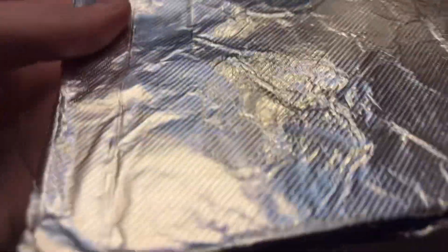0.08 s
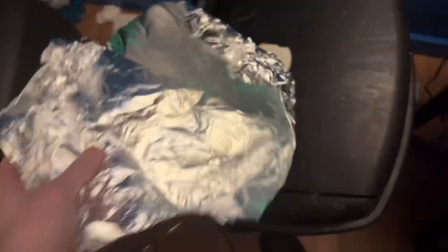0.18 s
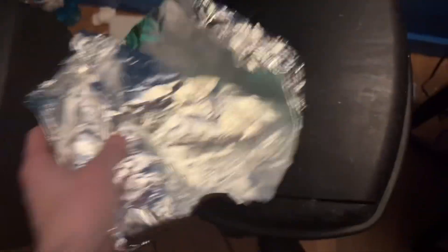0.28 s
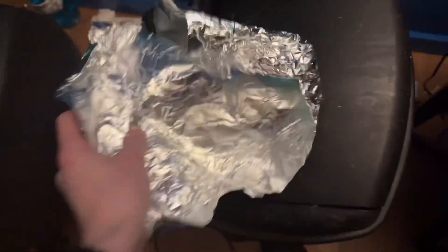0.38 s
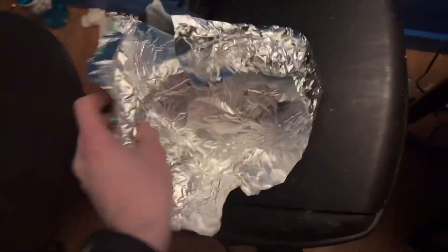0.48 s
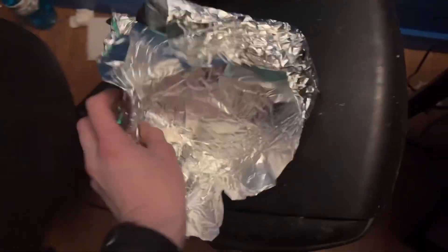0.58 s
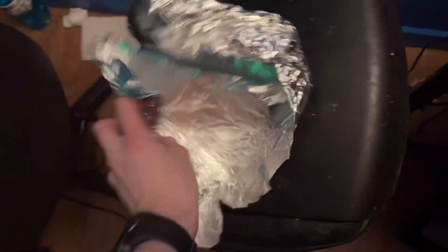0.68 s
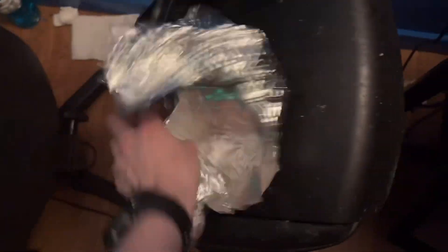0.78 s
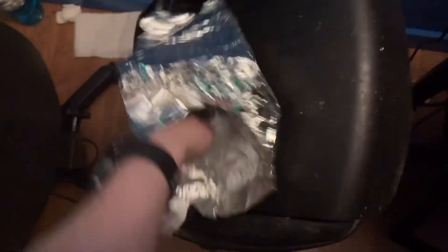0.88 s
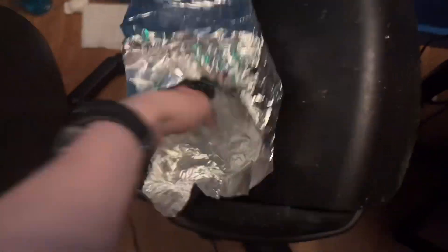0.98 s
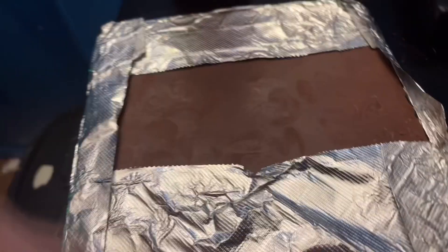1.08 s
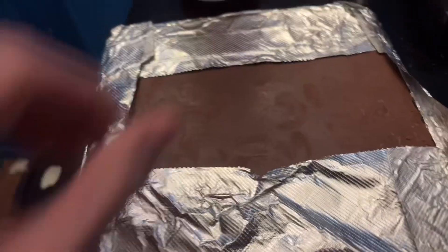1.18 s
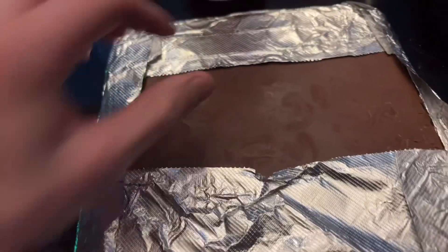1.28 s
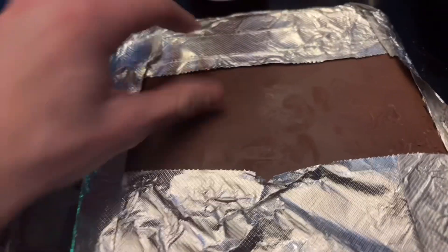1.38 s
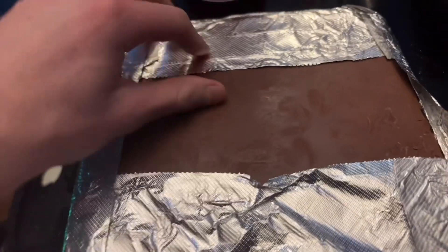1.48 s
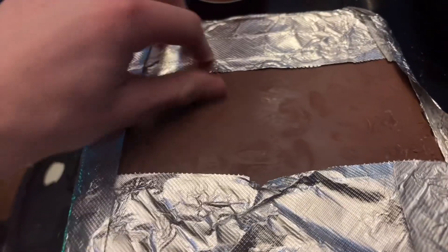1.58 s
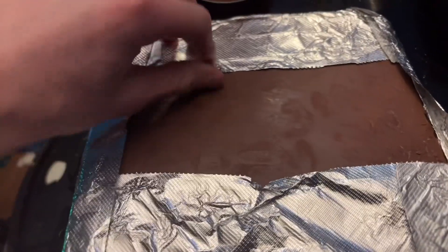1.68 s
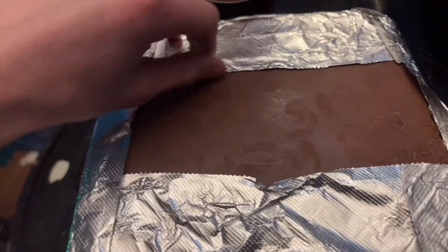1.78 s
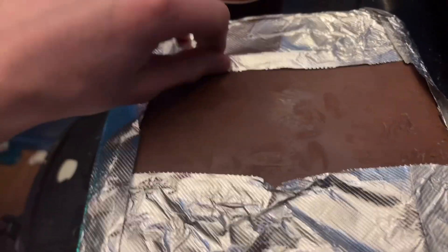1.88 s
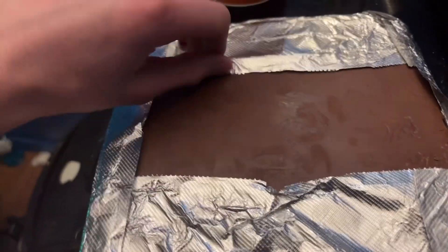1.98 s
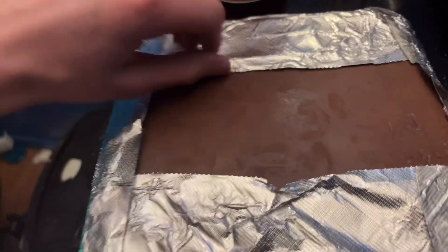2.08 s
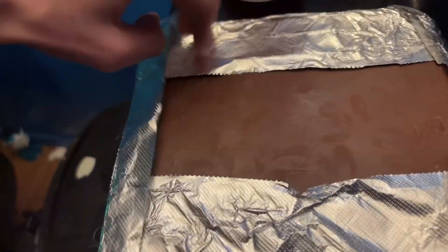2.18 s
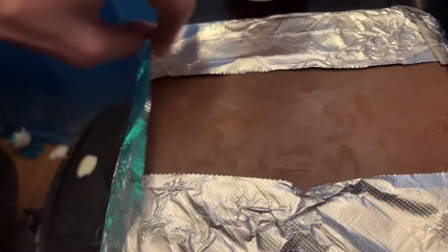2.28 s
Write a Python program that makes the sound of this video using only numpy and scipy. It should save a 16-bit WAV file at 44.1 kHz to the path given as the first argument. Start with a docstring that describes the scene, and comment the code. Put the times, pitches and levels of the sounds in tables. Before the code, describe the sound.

Aluminium foil crumples close to the microphone in a small room: faint rustle at first, a sharp burst at 0.21 s, uneven crackling, then the loudest dense snaps around 0.75-0.9 s, with hand thumps to 1.03 s. An abrupt cut at 1.05 s leaves low rumble and faint hiss. Fingers pick quietly from 1.4 s, tap the slab at 2.02 s, and crinkle slightly more towards 2.28 s.

```python
"""Aluminium foil crumples loudly, close to the microphone in a small room, as it comes off a chocolate slab
and is pushed down on a chair. Creases buckle in dense swarms of tiny rings over a dull drag of the hand;
sharper snaps are ticks with short runs of buckles, and bumps of the hand spread as bending waves.
After an abrupt cut, fingers pick quietly at the foil edge, its flap ringing, and tap the slab.
A low room rumble, with faint hiss, hum and whine made of filtered noise, lies under it all."""
import sys
import numpy as np
from scipy import signal
from scipy.fft import rfft, irfft
from scipy.io import wavfile
from scipy.ndimage import uniform_filter1d

SR = 44100
rng = np.random.default_rng(int(sys.argv[2]) if len(sys.argv) > 2 else 0)


def wav_out(sig):
    """Save sig, one row per channel (or a flat mono array), as 16-bit PCM at SR to the path in sys.argv[1]."""
    wavfile.write(sys.argv[1], SR, np.round(np.clip(np.atleast_2d(sig).T, -1, 1) * 32767).astype(np.int16))


N = 101430  # 2.3 s
CUT_S = 1.051  # the loud crumpling ends abruptly here


def undb(db):
    """Decibels to gain."""
    return 10 ** (np.asarray(db) / 20)


def unit(x):
    """Scale to rms 1."""
    return x / np.sqrt(np.mean(x ** 2) + 1e-18)


def add(out, s, x):
    """Mix x into out from time s."""
    i = int(np.clip(s * SR, 0, N - 1))
    out[i:i + len(x)] += x[:N - i]


def t60_decay(t, t60_s):
    """Exponential decay that falls 60 dB in t60_s seconds."""
    return np.exp(-np.log(1000) * t / t60_s)


def colour(x, points, size=4096):
    """Causal minimum-phase filter of unit energy through (f/Hz, level/dB) points."""
    hz, db = np.array(points).T
    bins_hz = np.arange(size // 2 + 1) * SR / size + 1
    gain = undb(np.interp(np.log(bins_hz), np.log(hz), db))
    # fold the cepstrum onto positive time
    cepstrum = irfft(np.log(gain))
    cepstrum[1:size // 2] *= 2
    cepstrum[size // 2 + 1:] = 0
    response = irfft(np.exp(rfft(cepstrum)))
    return signal.fftconvolve(x, response / np.linalg.norm(response))[:len(x)]


def ring(hz, cycles, size=1400):
    """A foil facet ringing briefly, unit energy; it decays by a factor e in the given cycles."""
    turn = np.arange(size) / SR * min(hz, .45 * SR)
    y = np.sin(2 * np.pi * turn) * np.exp(-turn / cycles)
    return y / np.linalg.norm(y)


def crackle(per_s, points, crack=1.0, even_s=0.015, facet_cycles=13.2, size_spread_db=3):
    """A swarm of buckling creases: each is a click and a ring of its own pitch and size."""
    out = np.zeros(N)
    rows = rng.random((int(per_s * N / SR), 4))
    for when, pitch, size, sign in rows:
        grain = ring(900 + 4600 * pitch, facet_cycles)
        grain[0] += crack * 2
        gain = undb(-size_spread_db * np.log(size + 0.18))  # few large, many small
        add(out, when * N / SR, grain * np.sign(sign - .5) * gain)
    y = colour(out, points)
    # even out the power so that the caller sets the level
    power = np.abs(uniform_filter1d(y ** 2, int(even_s * SR) + 1))
    return y / np.sqrt(power + 1e-9)


def clusters(t, per_s=130, decay_s=0.0097):
    """Buckles set each other off: the level jumps at random moments and dies away; spread 1."""
    out = np.zeros(N)
    for when, size in rng.random((int(per_s * N / SR), 2)):
        add(out, when * N / SR, (.5 + size) * np.exp(-t[:2048] / decay_s))
    out = np.sqrt(out)
    return unit(out - out.mean())


def sheet(t, per_s=1700, cluster_db=2):
    """The loose sheet crackles in clusters, as hard as the hand crumples it, over a dull drag."""
    # how hard the sheet is crumpled: t/s, level/dB
    crumple = [(0, -28), (0.019, -33.5), (0.051, -43), (0.072, -32.5), (.13, -35.5), (0.187, -43),
               (.194, -74), (0.213, -80), (0.215, -19.5), (.275, -20.5), (0.334, -23.5), (.385, -31),
               (.415, -26.5), (.44, -31), (0.465, -26.5), (0.477, -24), (0.508, -32.5), (.565, -31.5),
               (.615, -31.5), (.64, -27.5), (.694, -28.5), (.704, -24), (0.727, -23), (0.753, -11.5),
               (.79, -18.5), (0.812, -15), (0.861, -22), (0.878, -17), (.905, -20), (0.935, -25),
               (1.0, -35.5), (1.021, -27), (1.05, -25)]
    # colour of the loose sheet: f/Hz, level/dB per Hz
    sheet_colour = [(60, -31), (200, -19), (320, -12), (500, -15), (800, -14.5), (1200, -5), (1650, -6),
                    (2200, -2.5), (3100, -1), (4000, -6), (5000, -14.5), (6000, -21.5), (7300, -50.5),
                    (8800, -43.5), (13000, -38.5), (16000, -53.5)]
    # dull rumble of the hand dragging the sheet: f/Hz, level/dB per Hz
    drag_colour = [(25, -28), (50, -8), (100, -2.5), (180, -1.5), (240, -11), (320, -3), (450, -19),
                   (750, -11.5), (1500, -32.5), (4000, -77.5)]
    # level of that drag: t/s, level/dB
    drag_level = [(0, -47), (0.172, -40), (.2, -78), (0.229, -34), (.4, -44), (.48, -39), (.7, -46),
                  (0.817, -23.5), (.9, -42), (1.05, -41)]
    s, db = np.array(crumple).T
    level_db = np.interp(t, s, db)
    creases = crackle(per_s, sheet_colour) * undb(level_db + cluster_db * clusters(t))
    s, db = np.array(drag_level).T
    drag = unit(colour(rng.standard_normal(N), drag_colour)) * undb(np.interp(t, s, db))
    return creases + drag


def room(x, first_s=0.0022, t60_s=0.22, tail_db=-9):
    """Close furniture and walls give a short, dense tail."""
    t = np.arange(SR // 2) / SR
    tail = rng.standard_normal(len(t)) * t60_decay(t, t60_s) * (t > first_s)
    return x + undb(tail_db) * signal.fftconvolve(x, tail / np.linalg.norm(tail))[:N]


def air(air_db=-53.5):
    """Faint steady rumble and hiss, with a low hum and a thin whine from resonances on noise."""
    # colour of the room background: f/Hz, level/dB per Hz
    air_colour = [(25, -12.5), (58, -13.5), (90, -14.5), (124, -15.5), (220, -25.5), (320, -22.5),
                  (450, -30), (850, -34), (1200, -24.5), (1600, -28.5), (2400, -24), (3900, -38.5),
                  (4400, -44), (6000, -44.5), (8000, -55.5), (15000, -51.5)]
    # narrow resonances humming in the room: f/Hz, width/Hz, level/dB
    resonances = [(60.4, 24, -55), (317, 12, -69), (3820, 35, -69.5)]
    hz = np.arange(N // 2 + 1) * SR / N
    hum = np.zeros(N)
    for f, width, db in resonances:
        spectrum = rfft(rng.standard_normal(N)) / (1 + (2 * (hz - f) / width) ** 2)
        hum += undb(db) * unit(irfft(spectrum, N))
    return hum + undb(air_db) * unit(colour(rng.standard_normal(N), air_colour))


def snaps(count=5, size=2048, scatter=0.37, fade=0.96, after_db=-2, nominal_s=0.0028, bright_db=-38,
          cycles=4.3, crack=1.54, snap_db=-4):
    """A crease gives way with one sharp tick and a quick run of buckles, each weaker than the last."""
    # single creases snapping: t/s, level/dB (before snap_db), f/Hz, length of the run of buckles/s
    snap_events = [(0.0574, -20, 3830, 0.0085), (0.2147, -11.5, 2880, 0.0037), (0.2388, -16, 2550, 0.0037),
                   (.25, -11.5, 2930, 0.0033), (0.2716, -11, 2500, 0.011), (0.3493, -13, 3020, 0.011),
                   (0.4142, -18.5, 2890, .004), (0.469, -11, 3210, 0.005), (0.522, -24, 4300, 0.00099),
                   (0.594, -21, 2800, 0.0061), (0.628, -19, 2920, .005), (0.6995, -12, 2540, 0.004),
                   (0.7466, -8, 2780, 0.005), (.754, -14, 2830, 0.0017), (.765, -6.5, 2690, 0.0074),
                   (0.783, -12, 3100, 0.0027), (0.7948, -5.5, 3080, 0.00094), (0.8018, -10.5, 3230, 0.0028),
                   (0.816, -10, 3060, .003), (.824, -7, 2240, 0.0055), (0.8347, -10, 3000, .003),
                   (0.8717, -9, 2340, 0.0054), (0.893, -10, 2890, 0.0017), (0.956, -24, 3050, 0.0023),
                   (1.0114, -23.5, 2660, 0.0024), (1.4034, -39, 2620, 0.0015), (1.414, -39, 3900, 0.0024),
                   (1.424, -24.5, 2840, 0.003), (1.449, -46, 2400, 0.0016), (1.4827, -36.5, 2900, 0.0022),
                   (1.715, -31.5, 3370, 0.0045), (1.8192, -33, 3030, 0.0021), (1.8334, -32.5, 4020, 0.002),
                   (1.8415, -31, 4500, 0.00087), (1.845, -35, 3620, 0.0011), (1.863, -31.5, 2250, 0.00039),
                   (2.0213, -35.5, 6330, 0.00047), (2.045, -32.5, 2470, 0.0016),
                   (2.0985, -35, 2380, 0.0019), (2.1105, -32.5, 2600, 0.0031), (2.117, -33, 2900, 0.0018),
                   (2.178, -34.5, 2840, 0.004), (2.2152, -27.5, 2730, 0.0033),
                   (2.2222, -25.5, 3300, 0.0015), (2.2385, -33, 3440, 0.00036), (2.2472, -25, 2400, 0.0014),
                   (2.2675, -19.5, 3900, 0.0026), (2.2711, -20, 3320, 0.0007), (2.2858, -22, 2840, 0.001)]
    # colour of a snap: f/Hz, level/dB per Hz
    snap_colour = [(100, -26), (700, -10.5), (1300, -7), (3200, 5), (4500, 2.5), (5600, -8), (7300, -38),
                   (9500, -26.5), (16000, -33.5)]
    out = np.zeros(N)
    top_octave = signal.butter(4, 8800, "high", fs=SR, output="sos")
    for s, db, hz, length in snap_events:
        run = np.zeros(size)
        for k, (late, pitch, sign) in enumerate(rng.random((count, 3))):
            follows = k > 0  # the first tick keeps its own time, pitch and level
            grain = ring(hz * np.exp(scatter * (2 * pitch - 1) * follows), cycles)
            grain[0] += crack
            delay_s = min(length, .025) * (k + late) / count * follows
            add(run, delay_s, grain * fade ** k * undb(after_db * follows) * np.sign(sign - .5))
        # the faster the crease gives way, the more it fizzes in the top octave
        fizz = signal.sosfilt(top_octave, run)
        fizz_gain = undb(bright_db) * nominal_s / max(length, .0004)
        run = colour(run, snap_colour)
        run = run / np.linalg.norm(run) + fizz_gain * fizz / np.linalg.norm(fizz)
        add(out, s, run * np.sqrt(nominal_s * SR) * undb(db + snap_db))
    return out


def bumps(size=8192):
    """A blow spreads as a bending wave: the tap arrives first, the thud last, later the farther it travels."""
    # bumps of the hand on foil and slab: t/s, thud level/dB, knock level/dB, tap level/dB,
    # bend/cycles (each frequency arrives this many of its own cycles late)
    blows = [(0.0757, -31.5, -30.5, -27, 1.1), (0.216, -24, -21.5, -25, 1.32),
             (0.8003, -31, -25, -34, 0.88), (0.808, -25, -21, -38, 0.71),
             (0.9204, -26.5, -25.5, -9.5, 1.22), (1.0127, -34.5, -31, -24, 1.14),
             (1.0214, -22, -19.5, -12.5, 0.88), (1.026, -13.5, -25.5, -20, 0.71),
             (1.4319, -44, -26.5, -34, 0.77), (1.464, -50, -40.5, -65, 1.3), (1.819, -44, -70, -60, 1.15),
             (1.93, -52, -43, -48, 1.35), (1.951, -41, -75, -75, 1.15), (2.0215, -31.5, -28.5, -15, 0.95),
             (2.2816, -58, -35, -32, 0.68)]
    out, hz = np.zeros(N), np.arange(size // 2 + 1) * SR / size + 1
    lead = size // 32  # samples kept ahead of the blow for the start of each band
    thud_hz = 69.7
    # thud, knock and tap: centre Hz, width in octaves; the thud is the narrower boom
    shapes = ((thud_hz, 0.67), (323, 0.91), (1740, 0.91))
    bands = [np.exp(-.5 * (np.log2(hz / f) / octaves) ** 2) for f, octaves in shapes]
    for s, thud_db, knock_db, tap_db, bend in blows:
        spread = np.exp(-2j * np.pi * bend * np.log(hz / thud_hz))
        spread = spread / np.sqrt(1 + (hz / 2300) ** 24)  # steep loss above 2300 Hz
        blow = np.zeros(size)
        for db, band in zip((thud_db, knock_db, tap_db), bands):
            part = np.roll(irfft(spread * band), lead)
            blow += undb(db) * part / np.abs(part).max()
        add(out, s - lead / SR, blow)
    return out


def body(x, body_db=-12.5, scatter_db=-4, scatter_s=0.0051):
    """Bumps scatter at the edges of the slab and leave a short low ring."""
    # what a bump sets ringing in the slab and its support: f/Hz, t60/s, level/dB (before body_db)
    ringing_modes = [(168, 0.21, -15.5), (270, 0.3, -7), (316.6, 0.17, 1), (398, 0.2, -22.5),
                     (470, 0.35, -3), (763, 0.046, 10.5)]
    t = np.arange(SR // 2) / SR
    modes = sum(undb(db) * np.sin(2 * np.pi * hz * t) * t60_decay(t, t60) for hz, t60, db in ringing_modes)
    band = signal.butter(2, (160, 900), "bandpass", fs=SR, output="sos")
    echoes = signal.sosfilt(band, rng.standard_normal(len(t)) * np.exp(-t / scatter_s))
    response = undb(body_db) * modes / np.sqrt(len(t))
    response += undb(scatter_db) * echoes / np.sqrt(scatter_s * SR / 2)
    return x + signal.fftconvolve(x, response)[:N]


def edge(t, per_s=1800, edge_db=4):
    """The wrapped edge crackles under the fingers: each rub swells and dies away."""
    # fingers rubbing the foil edge: peak t/s, rise/s, decay/s, level/dB (before edge_db)
    rubs = [(1.427, 0.0076, 0.007, -34.5), (1.592, 0.021, 0.01, -46.5), (1.634, 0.0081, 0.016, -49),
            (1.714, 0.018, 0.019, -48.5), (1.836, 0.018, 0.0054, -43.5), (1.973, 0.014, 0.036, -53),
            (2.071, 0.028, 0.01, -50.5), (2.122, 0.0067, 0.0079, -42), (2.191, 0.01, 0.019, -50),
            (2.227, .015, 0.035, -44.5), (2.285, 0.012, 0.035, -39)]
    # colour of the wrapped edge: f/Hz, level/dB per Hz
    edge_colour = [(100, -2.5), (350, -3.5), (800, -9), (1400, -3), (2400, 0.5), (3400, 2), (4500, -7),
                   (5500, -12.5), (7300, -32), (10000, -34.5), (16000, -36)]
    power = np.zeros(N)
    for s, rise, decay, db in rubs:
        power += undb(db) ** 2 * np.exp(-2 * np.maximum((s - t) / rise, (t - s) / decay))
    return crackle(per_s, edge_colour, crack=1.9, even_s=0.013) * np.sqrt(power) * undb(edge_db)


def flap(x, hz=2880, t60_s=0.06, flap_db=-15.5):
    """Picking sets the lifted flap of foil ringing on; flap_db is relative to the picking."""
    t = np.arange(SR // 2) / SR
    tone = np.sin(2 * np.pi * hz * t) * t60_decay(t, t60_s)
    return x + undb(flap_db) * np.std(x) * unit(signal.fftconvolve(x, tone)[:N])


def scene():
    """Loud crumpling up to the cut, quiet picking after it, room background throughout."""
    t = np.arange(N) / SR
    before, creases, blows = t < CUT_S, snaps(), bumps()
    crumpling = room(sheet(t) + creases * before) + body(blows * before)
    crumpling = crumpling * before  # the cut takes the tails too
    picking = room(flap(edge(t) + creases * ~before)) + body(blows * ~before)
    return (crumpling + picking + air())[None]


def record(dry, top_hz=15900):
    """The recorder clips the highest peaks and cuts the top."""
    low_pass = signal.ellip(10, .2, 70, top_hz, fs=SR, output="sos")
    return signal.sosfilt(low_pass, np.clip(dry, -.95, .95))


dry = scene()
out = record(dry)
wav_out(out)
```